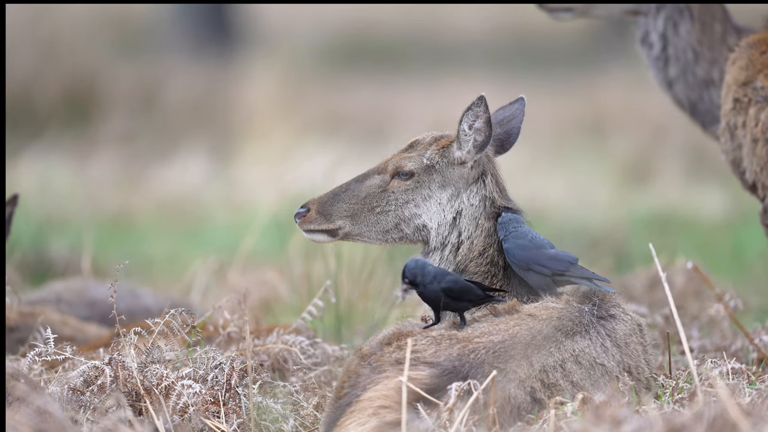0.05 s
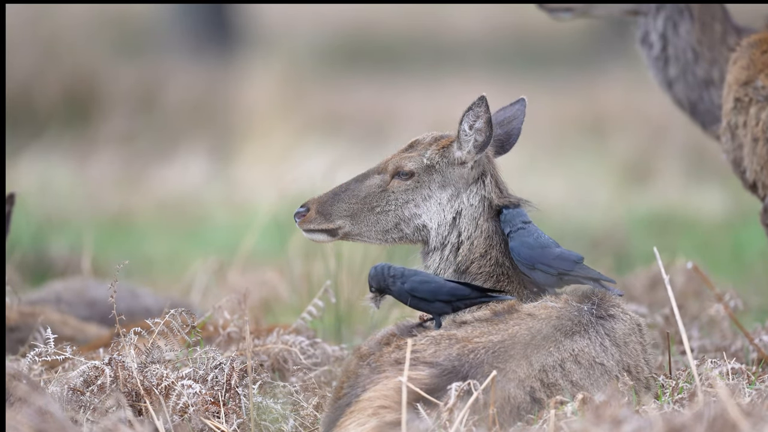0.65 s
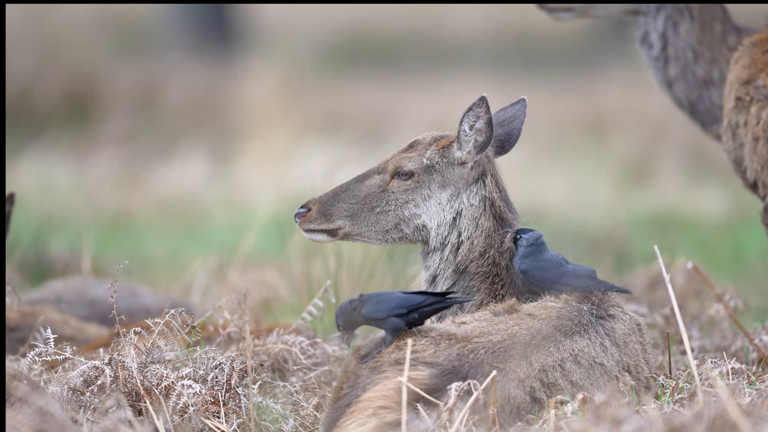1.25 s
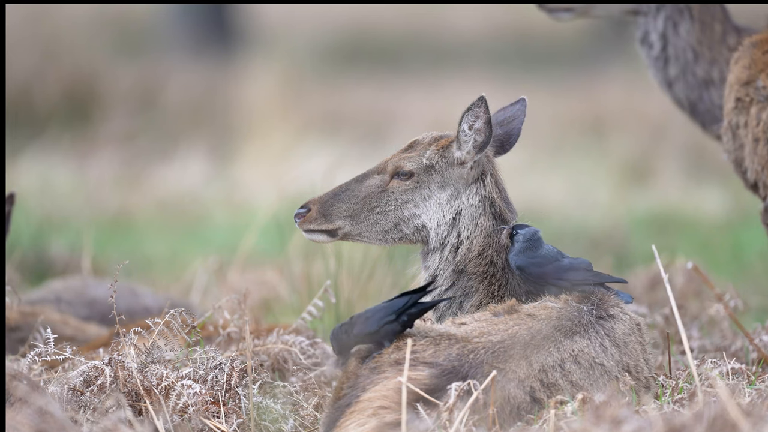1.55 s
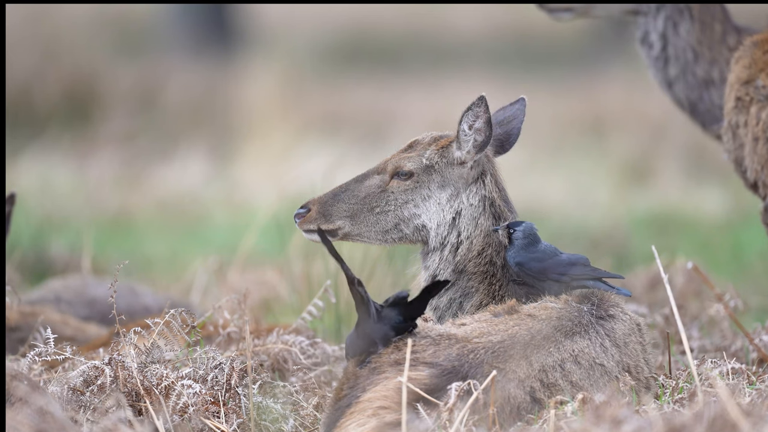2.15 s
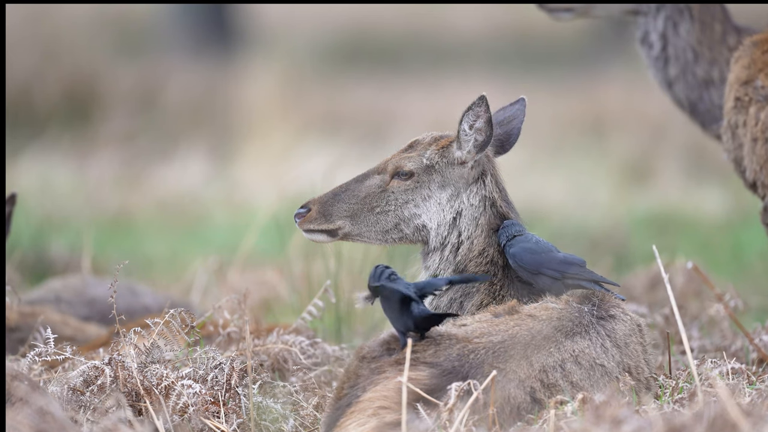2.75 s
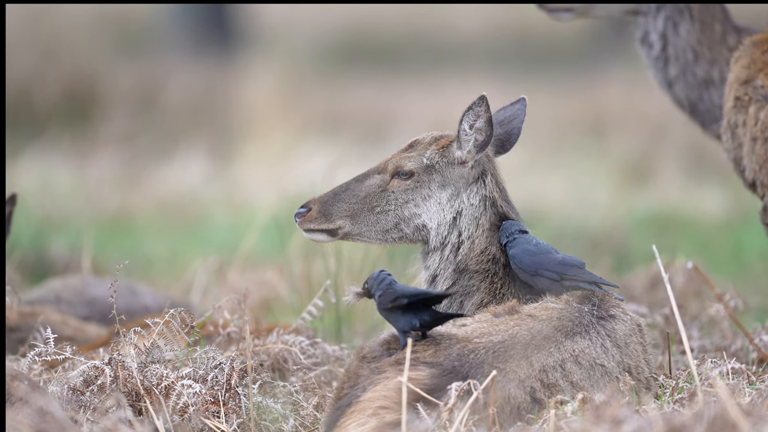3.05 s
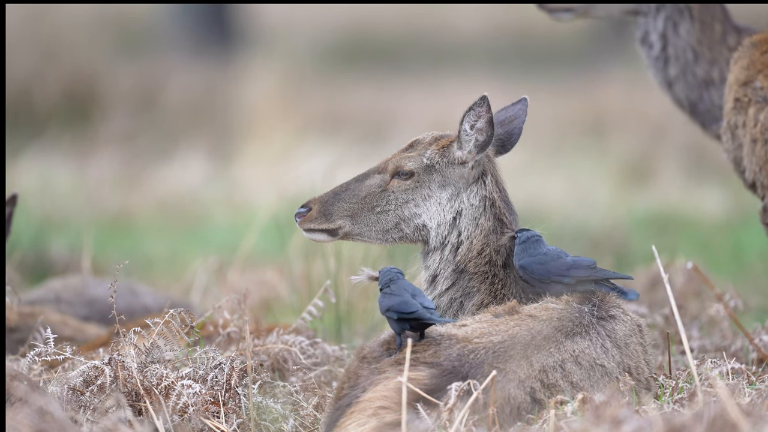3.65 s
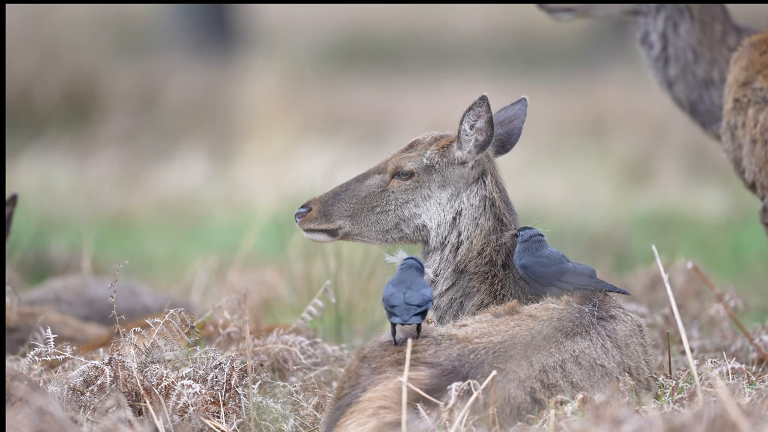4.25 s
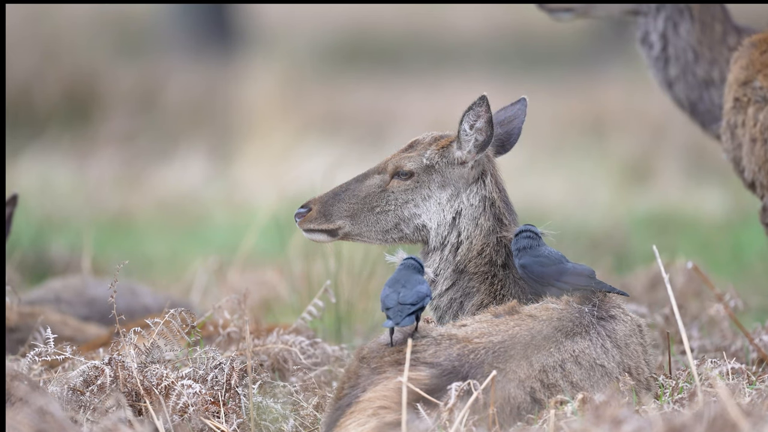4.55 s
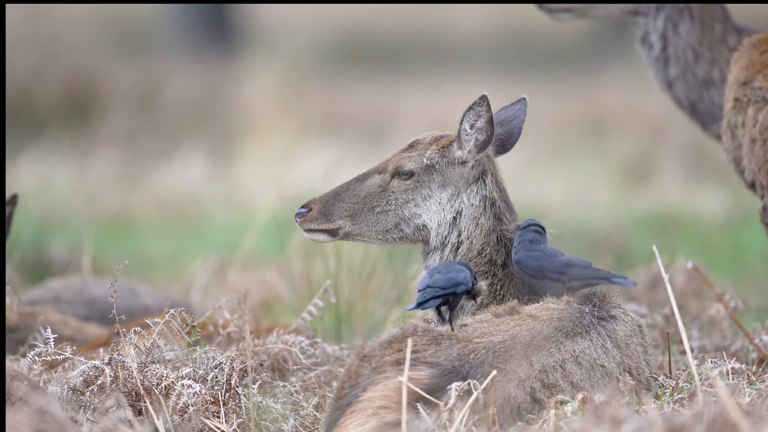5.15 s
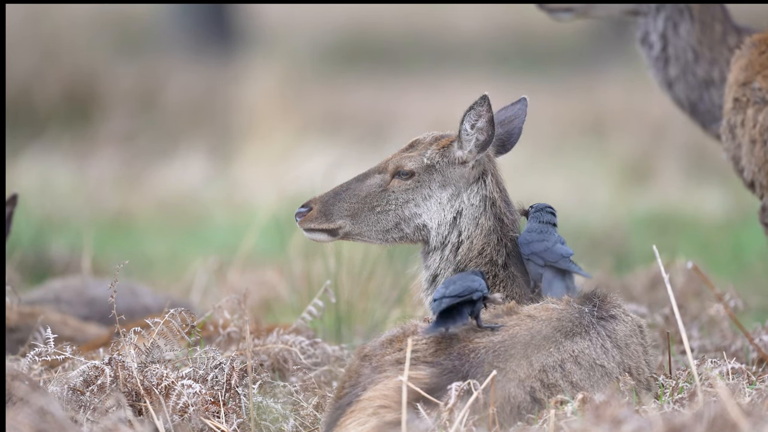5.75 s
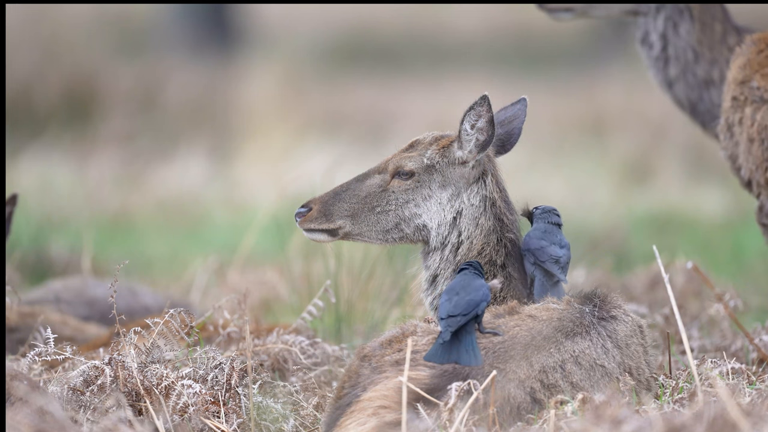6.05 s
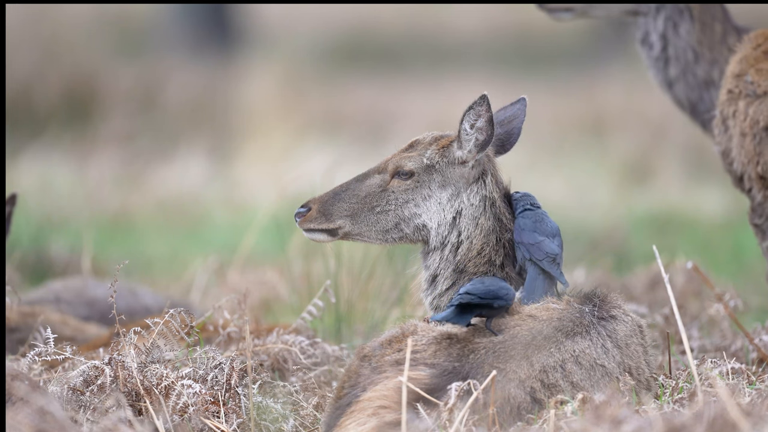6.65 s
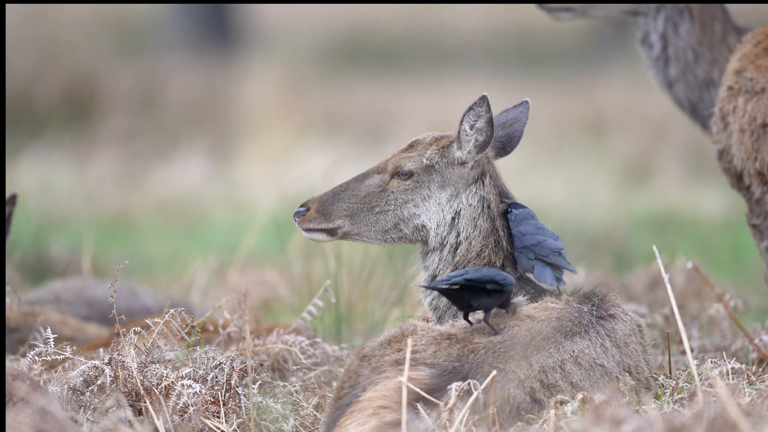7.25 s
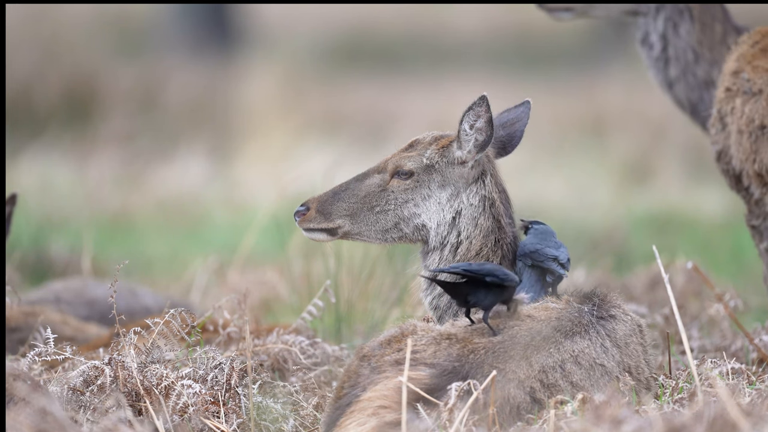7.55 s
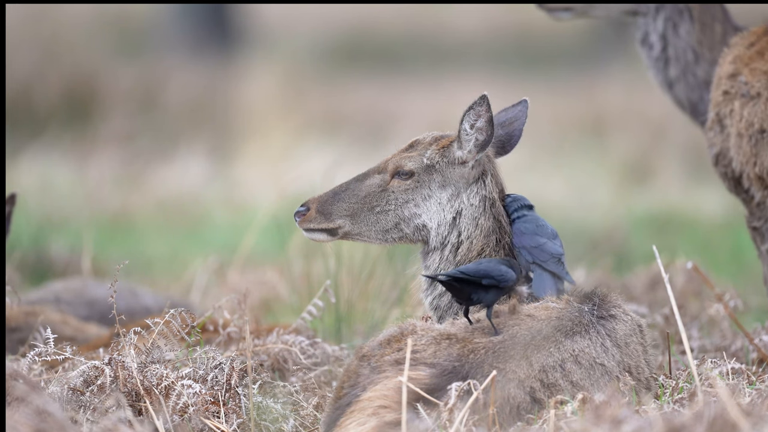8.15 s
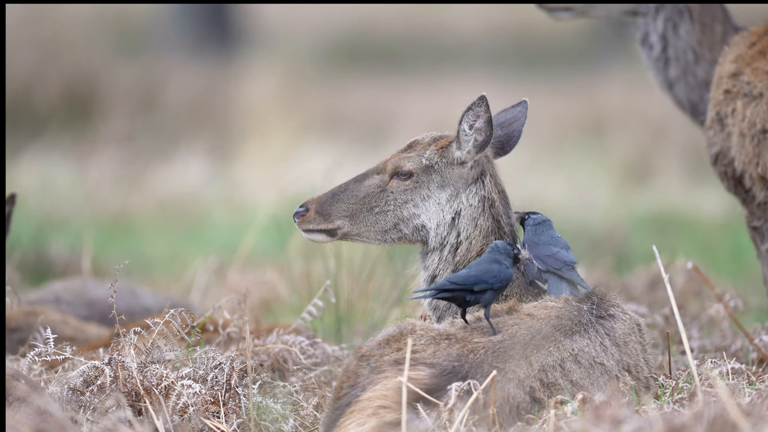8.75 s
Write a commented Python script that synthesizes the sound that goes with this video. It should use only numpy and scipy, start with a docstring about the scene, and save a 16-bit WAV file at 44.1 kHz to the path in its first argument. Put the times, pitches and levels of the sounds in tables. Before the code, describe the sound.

In open parkland, a small unseen bird fairly near the microphone gives a thin, very high whistle, runs into a quick warble, then breaks into a loud twittering chatter with sharp chips. A soft rustle, like wings, swells under it. After that only faint distant calls and ticks remain, with a few thin whistles near the end. A low rumble of far traffic continues throughout.

```python
"""Songbird in open parkland

A small bird gives thin high whistles, a warble and a quick chatter, often from both sides of its
syrinx at once, so that two tones beat. A line of trees reflects the song, and a soft rustle, likely
of wings, swells under the chatter. Other birds call far away over the rumble of distant traffic;
the electronics add a faint hiss and a high whine."""
import sys
import numpy as np
from scipy import signal
from scipy.fft import rfft, irfft
from scipy.io import wavfile
from scipy.ndimage import uniform_filter1d, map_coordinates

SR = 44100
rng = np.random.default_rng(int(sys.argv[2]) if len(sys.argv) > 2 else 0)


def wav_record(signal):
    """Record a signal, one row per channel, as 16-bit PCM in the file named by sys.argv[1]."""
    frames = np.transpose(np.atleast_2d(signal))
    bounded = np.clip(frames, -1, 1)
    # unit amplitude maps onto the largest positive 16-bit level
    quanta = np.round(bounded * 32767).astype(np.int16)
    wavfile.write(sys.argv[1], SR, quanta)


N = 392490
TIME = np.arange(N) / SR
CUTOFF_HZ = 15900


def from_db(db):
    """The decibel scale: 20 dB is a factor of ten in amplitude."""
    return 10 ** (np.asarray(db) / 20)


def rms_one(x):
    """Normalisation to unit rms."""
    return x / np.sqrt(np.mean(x ** 2) + 1e-20)


def at_hz(points, hz):
    """Interpolation of a table on a logarithmic frequency axis."""
    freqs, values = np.transpose(points)
    return np.interp(np.log(np.maximum(hz, 1)), np.log(freqs), values)


def pan(left_db):
    """Level difference as a cue to direction: the left and right gains."""
    return from_db(np.array([[.5], [-.5]]) * left_db)


def drift(rate_hz, size):
    """Random modulation: a smooth curve through rate_hz values a second, each of spread 1."""
    steps = np.arange(size) * rate_hz / SR
    return map_coordinates(rng.standard_normal(int(steps[-1]) + 3), [steps], order=3, mode="mirror")


def delayed(x, seconds):
    """Propagation delay, interpolated between samples."""
    return np.interp(TIME - seconds, TIME, x, left=0)


def add(track, start_s, sound):
    """Superposition: a sound sums into a track."""
    at = round(start_s * SR)
    track[at:at + len(sound)] += sound[:N - at]


def gate(size, edge_s):
    """A window with raised-cosine edges, which limit spectral splatter."""
    from_edge = np.minimum(np.arange(size), np.arange(size)[::-1]) / SR
    return np.sin(np.pi / 2 * np.clip(from_edge / edge_s, 0, 1)) ** 2


def scatter(x, t60_s, gap_s=0):
    """Diffuse reflection from ground and plants: an exponential decay, different on each side."""
    t = TIME[:SR]
    tail = rng.standard_normal((2, SR)) * from_db(-60 * t / t60_s) * (t > gap_s)
    tail /= np.sqrt(np.sum(tail ** 2, axis=1, keepdims=True))
    return signal.fftconvolve(x[None], tail, axes=1)[:, :N]


# Likeness of the left and right noise: frequency_hz, correlation
NOISE_CORRELATION = [(40, 1), (150, 0.76), (350, 0.1), (700, 0.68), (1300, -0.38), (3000, 0.03)]
# Lean of the noise to one side: frequency_hz, left_minus_right_db
NOISE_BALANCE = [(60, 0.39), (150, 7.1), (380, 5.9), (950, 3), (6000, 2.67)]


def air_noise(spectrum):
    """Partial coherence: coloured stereo noise from mid and side parts; the channel mean has rms 1."""
    hz = np.arange(N // 2 + 1) * SR / N
    correlation = np.clip(at_hz(NOISE_CORRELATION, hz), -.99, .99)
    mid, side = rfft(rng.standard_normal((2, N)))
    pair = mid + np.sqrt((1 - correlation) / (1 + correlation)) * side * [[1], [-1]]
    noise = irfft(pair * pan(at_hz(NOISE_BALANCE, hz)) * from_db(at_hz(spectrum, hz)), N)
    return noise / np.std(noise.mean(axis=0))


# Spectrum of the road: frequency_hz, relative_density_db
ROAD_SPECTRUM = [(30, -9), (60, -23.5), (115, -7.5), (270, -3.5), (450, -1.5), (550, 0.5), (730, 0.5),
                 (1100, -12), (1800, -18.5), (3000, -48)]
# Envelope of one far motor: time_s, level_db
MOTOR_ENVELOPE = [(0, -85), (1.2, -76.5), (3.6, -74), (4.4, -75.5), (5, -85)]


def traffic(road_db=-62.5, swell_db=0.34, swell_rate_hz=4, hum_hz=299, wander_hz=3):
    """A tone in broadband noise: one motor's wandering hum stands out from a gently swelling road."""
    road = air_noise(ROAD_SPECTRUM) * from_db(road_db + swell_db * drift(swell_rate_hz, N))
    phase = 2 * np.pi * np.cumsum(hum_hz + wander_hz * drift(11, N)) / SR
    hum = np.sqrt(2) * np.sin(phase) * from_db(np.interp(TIME, *np.transpose(MOTOR_ENVELOPE)))
    return road + hum * pan(left_db=9)


def slur(first_hz, last_hz, length_s, waver, arch_ratio=.04, edge_s=0.0063, waver_rate_hz=450):
    """Random frequency modulation makes an arched glide hoarse; waver is a share of the pitch."""
    size = int(length_s * SR)
    arch = arch_ratio * np.sin(np.linspace(0, np.pi, size))
    hz = np.geomspace(first_hz, last_hz, size) * (1 + arch + waver * drift(waver_rate_hz, size))
    return np.sqrt(2) * gate(size, edge_s) * np.sin(2 * np.pi * np.cumsum(hz) / SR)


def far_flock(level_db, low_hz, high_hz, length_s, count):
    """Partial masking: the farthest birds call at random, barely heard over the road."""
    out = np.zeros(N)
    for when, pitch in rng.random((count, 2)):
        hz = low_hz * (high_hz / low_hz) ** pitch
        add(out, when * TIME[-1], from_db(level_db) * slur(hz, hz * .92, length_s, waver=.03))
    return out


# Slurred calls of far birds: start_s, length_s, first_hz, last_hz, relative_db, waver_ratio
FAR_SLURS = [(0.075, 0.05, 2090, 2100, -75, .02), (0.558, 0.082, 1980, 1895, -69.5, 0.014),
             (3.029, 0.056, 2600, 2500, -72.5, 0.034), (3.105, 0.046, 3580, 5140, -71.5, 0.025),
             (3.069, 0.32, 1937, 1963, -77.5, 0.023), (3.367, 0.08, 3260, 3200, -74.5, 0.022),
             (3.482, 0.049, 1370, 1380, -69, .02), (3.85, 0.056, 1460, 1603, -73, .03),
             (5.51, 0.05, 3300, 2690, -74.5, 0.056), (5.7, 0.056, 3055, 2850, -70, 0.056),
             (5.777, 0.11, 3090, 2396, -71.5, .08), (6.19, 0.054, 2130, 2160, -72, .07),
             (6.43, 0.067, 2050, 2720, -76, .02), (6.485, 0.12, 2760, 2360, -72.5, 0.019),
             (6.491, 0.1, 4740, 4490, -76, 0.032), (6.499, 0.09, 1350, 1260, -68.5, .02),
             (7.335, 0.04, 3220, 3200, -76, .015), (7.48, 0.06, 5400, 5980, -78, .03),
             (7.792, 0.031, 5040, 5050, -72, .03), (7.842, 0.049, 2125, 2394, -69.5, 0.079),
             (8.08, 0.056, 2320, 2290, -70.5, 0.089), (8.097, 0.031, 4980, 5560, -71, .05),
             (8.5, 0.14, 1640, 1448, -77.5, .025)]
# One far bird's runs of falling ticks: first_tick_s, last_tick_s, starting_pitch_hz, relative_db
FAR_TICKS = [(4.772, 4.854, 4400, -70), (5.043, 5.158, 3900, -69.5), (5.252, 5.323, 3750, -67.5),
             (6.16, 6.32, 3900, -71.5), (7.756, 7.859, 4000, -71.5), (8.508, 8.875, 3900, -73.5)]


def far_birds(direct_call_db=-6, tick_db=-3, direct_tick_db=-2, scattered_db=-0.5, tick_gap_s=.075):
    """Scattering blurs hoarse calls and uneven ticks, whose overtones are lost over the distance."""
    calls, ticks = np.zeros((2, N))
    for start_s, length_s, first_hz, last_hz, level_db, waver in FAR_SLURS:
        add(calls, start_s, from_db(level_db) * slur(first_hz, last_hz, length_s, waver))
    for first_s, last_s, run_hz, level_db in FAR_TICKS:
        for start_s in np.linspace(first_s, last_s, round((last_s - first_s) / tick_gap_s) + 1):
            higher, louder = rng.uniform(-1.01, 1, 2)
            hz = run_hz * (1 + 0.0903 * higher)
            tick = slur(hz, hz * .74, length_s=0.0217, waver=0.032)
            add(ticks, start_s, from_db(level_db + tick_db + 2 * louder) * tick)
    direct = from_db(direct_call_db) * calls + from_db(direct_tick_db) * ticks
    return direct + from_db(scattered_db) * scatter(calls + ticks, t60_s=0.2)


# Swell of the rustle: time_s, level_db
RUSTLE_ENVELOPE = [(1.7, -89), (1.9, -67.5), (2.13, -63.5), (2.3, -81), (2.65, -73.5), (3.1, -81)]
# Spectrum of the rustle: frequency_hz, relative_density_db
RUSTLE_SPECTRUM = [(600, -28.5), (1500, 1.5), (4500, -2), (12000, -29)]


def rustle():
    """Amplitude-modulated noise, as of feathers brushing the air."""
    level_db = np.interp(TIME, *np.transpose(RUSTLE_ENVELOPE), left=-np.inf, right=-np.inf)
    return air_noise(RUSTLE_SPECTRUM) * from_db(level_db)


# Reflections from the line of trees: delay_s, left_db, right_db
TREE_ECHOES = [(0.154, -36.5, -27), (0.313, -47, -42.5)]


def park(song, left_db=2.0, lag_s=.00001, ground_db=-20, tail_db=-24, tail_hz=3700):
    """Multipath propagation: direct sound, early scatter from bracken, a dull tail and tree echoes."""
    direct = np.array([song, delayed(song, lag_s)]) * pan(left_db)
    echoes = sum(from_db([[left], [right]]) * scatter(delayed(song, delay_s), t60_s=0.01978)
                 for delay_s, left, right in TREE_ECHOES)
    ground = from_db(ground_db) * scatter(song, t60_s=0.1003, gap_s=0.0091)
    dull = signal.sosfilt(signal.butter(2, tail_hz, fs=SR, output="sos"), song)
    tail = from_db(tail_db) * scatter(dull, t60_s=0.49, gap_s=0.013)
    return direct + ground + tail + echoes


def contour(points, size):
    """Linear interpolation of pitch and level along a note, from rows of place, pitch_hz, level_db."""
    place, hz, level_db = np.transpose(points)
    along = np.linspace(place[0], place[-1], size)
    return np.interp(along, place, hz), np.interp(along, place, level_db)


def note(start_s, length_s, middle_hz, glide_hz, level_db, bend, fade_db):
    """Parabolic modulation of a glide: its ends are raised by the share bend and softer by fade_db."""
    place = np.linspace(-1, 1, int(length_s * SR))
    hz = middle_hz * (1 + bend * place ** 2) + glide_hz * place / 2
    return start_s, hz, level_db - fade_db * place ** 2


# The longest whistle, thin and high: time_s, pitch_hz, level_db
WHISTLE_CONTOUR = [(1.07, 8809, -61), (1.08, 8758, -62), (1.19, 8313, -57.5), (1.25, 8290, -56),
                   (1.37, 8410, -56.5), (1.416, 8111, -60), (1.425, 8100, -61)]
# Plain whistles: start_s, length_s, middle_hz, glide_hz, level_db, arch_ratio
WHISTLE_NOTES = [(0.93, 0.12, 8010, -130, -59.5, 0.0036), (1.047, 0.0098, 8330, 200, -62, .01),
                 (1.074, 0.35, 7730, -480, -64, .001), (1.638, 0.027, 4330, 200, -41, .035),
                 (1.755, 0.016, 4285, -120, -28, .02), (1.834, 0.041, 2540, -20, -40.5, .001),
                 (1.985, 0.15, 2970, -170, -55, .05), (2.011, 0.115, 3460, -170, -51.5, 0.04),
                 (8.456, 0.053, 8240, 0, -62, 0.079), (8.512, 0.027, 7800, -150, -59.5, 0.028),
                 (8.545, 0.045, 8460, 904, -67.5, .035), (8.839, 0.085, 7620, 400, -66, .025)]


def whistles():
    """Two independent oscillators: whistles that overlap come from the two sides of the syrinx."""
    first_s, last_s = WHISTLE_CONTOUR[0][0], WHISTLE_CONTOUR[-1][0]
    longest = (first_s, *contour(WHISTLE_CONTOUR, int((last_s - first_s) * SR)))
    return [longest] + [note(*row, bend=-arch, fade_db=4) for *row, arch in WHISTLE_NOTES]


# Scoops of the warble: start_s, length_s, middle_hz, glide_hz, level_db
WARBLE_SCOOPS = [(1.599, 0.026, 3630, 251, -49), (1.621, 0.031, 2980, -350, -49),
                 (1.667, 0.026, 3810, 1.5, -36.5), (1.693, 0.037, 4340, -49.5, -33.5),
                 (1.731, 0.025, 4180, -330, -31.5), (1.769, 0.045, 3410, -100, -36),
                 (1.816, 0.018, 3024, -600, -38.5), (1.948, 0.018, 3260, 52, -47),
                 (1.978, 0.017, 3400, 200, -52), (1.997, 0.016, 3480, 149.5, -50)]


def warble():
    """Rapid frequency modulation: a chain of short notes, each dipping in pitch."""
    return [note(*row, bend=0.078, fade_db=3.5) for row in WARBLE_SCOOPS]


# One twitter sung twice: start_s, length_s, pitch_ratio, level_db, first_arch_push_db
CHATTER = [(2.152, 0.104, .995, -26, -6), (2.448, 0.108, 1.005, -25.5, 4)]
# Its waving lower voice and nearly level upper voice: place_in_lengths, pitch_hz, relative_db
LOWER_VOICE = [(0, 2667, -18), (.12, 2942, -9), (.17, 3473, -3), (.25, 4180, -3.5), (.36, 4130, -13.5),
               (.46, 3330, -8.5), (.53, 3330, -5.5), (.57, 3550, -8.5), (.61, 3760, 0.5), (.68, 3773, -2),
               (.78, 3520, -19), (.88, 3020, -11), (1, 2430, -17.5)]
UPPER_VOICE = [(0.239, 4756, -16.5), (.35, 5198, -9.5), (.39, 5243, -14.5), (.44, 4950, -32),
               (.57, 5150, -29.5), (.63, 4915, -2), (.71, 4880, -1), (.77, 4900, -23), (.97, 4870, -21)]
# Its three closing pips: start_in_lengths, length_s, middle_hz, glide_hz, relative_db
CLOSING_PIPS = [(1, 0.014, 3770, -80, -2.5), (1.15, 0.013, 4280, -150, -14),
                (1.29, 0.015, 3250, 448.5, -5.5)]


def twitters(arch_place=0.28, arch_width=0.099):
    """Biphonation: both sides of the syrinx sing together in each twitter, then come the pips."""
    notes = []
    for start_s, length_s, pitch_ratio, level_db, push_db in CHATTER:
        for voice in (LOWER_VOICE, UPPER_VOICE):
            first, last = voice[0][0], voice[-1][0]
            hz, db = contour(voice, int((last - first) * length_s * SR))
            place = np.linspace(first, last, len(hz))
            arch = np.exp(-((place - arch_place) / arch_width) ** 2)
            notes.append((start_s + first * length_s, pitch_ratio * hz, level_db + db + push_db * arch))
        for place, pip_s, hz, glide_hz, db in CLOSING_PIPS:
            notes.append(note(start_s + place * length_s, pip_s, pitch_ratio * hz, glide_hz,
                              level_db + db, bend=0, fade_db=10.5))
    return notes


# Loud chips: start_s, length_s, first_hz, top_hz, level_db, swell_db
CHIP_NOTES = [(2.303, 0.036, 4190, 4427, -22, 0.5), (2.603, 0.039, 3840, 4490, -23, 1.5),
              (2.801, 0.048, 3493, 4546, -28, 10.5)]


def chips(climb_share=.52, dive_s=.0145, last_hz=2000, fade_db=29):
    """Coupled frequency and amplitude sweeps: a chip swells as it climbs, holds, and fades in a dive."""
    notes = []
    for start_s, length_s, first_hz, top_hz, level_db, swell_db in CHIP_NOTES:
        t = TIME[:int(length_s * SR)]
        below_top = np.clip(1 - t / (climb_share * length_s), 0, 1) ** 2
        dive = np.clip(1 - (length_s - t) / dive_s, 0, 1)
        climb_hz = top_hz + (first_hz - top_hz) * below_top
        hz = climb_hz * (last_hz / top_hz) ** (dive ** 1.164)
        notes.append((start_s, hz, level_db - swell_db * below_top - fade_db * dive ** 1.517))
    return notes


CHATTER_S = 2.14  # from here on the bird forces its notes
# Radiation of overtones from the beak: overtone_hz, relative_db
BEAK_RESPONSE = [(5600, -13.5), (6600, -30), (7500, -27.5), (8400, -42), (10500, -37.5), (14000, -56.5)]


def syrinx(notes, edge_s=0.0028, waver_hz=30, flutter_db=1.4, third_db=-3, forced_db=4):
    """Self-sustained oscillation: nearly pure tones; forcing strengthens their tremble and overtones."""
    out, last_phase = np.zeros(N), np.zeros(2 * N)
    margin = int(edge_s * SR / 2)
    for start_s, pitch_hz, note_db in sorted(notes, key=lambda sung: sung[0]):
        at, size = round(start_s * SR), len(pitch_hz)
        force = from_db(forced_db * (start_s > CHATTER_S))
        hz = np.pad(pitch_hz, margin, mode="edge")
        level_db = np.pad(note_db, margin, mode="edge")
        hz += force * waver_hz * drift(rate_hz=330, size=len(hz))
        level_db += force * flutter_db * drift(rate_hz=170, size=len(hz))
        phase = 2 * np.pi * np.cumsum(hz) / SR
        phase += last_phase[at] - phase[margin]  # a slurred note carries on the phase of the one before
        last_phase[at - margin:at + size + margin] = phase
        tone = np.sin(phase)
        for harmonic, extra_db in ((2, 0), (3, third_db)):
            gain = force * from_db(at_hz(BEAK_RESPONSE, harmonic * hz) + extra_db)
            tone += gain * np.sin(harmonic * phase) * (harmonic * hz < CUTOFF_HZ)
        add(out, start_s - margin / SR, np.sqrt(2) * tone * from_db(level_db) * gate(len(hz), edge_s))
    return out


def near_bird(coupling=0.12, rasp_db=-24, rasp_band_hz=(2900, 5700), calm_db=-10):
    """Nonlinear mixing of two voices makes combination tones.
    A band of noise follows the song's loudness and roughens it, most in the chatter."""
    song = syrinx(whistles() + warble() + twitters() + chips())
    power = np.abs(signal.hilbert(song)) ** 2
    steady = uniform_filter1d(power, size=110)  # a 2.5 ms average smooths out the beats
    beat = (power - steady) / (np.abs(steady) + 1e-9)
    rasp_band = signal.butter(2, rasp_band_hz, "band", fs=SR, output="sos")
    rasp = rms_one(signal.sosfilt(rasp_band, rng.standard_normal(N))) * np.sqrt(power / 2)
    return song * (1 - coupling * beat) + rasp * from_db(rasp_db + calm_db * (TIME < CHATTER_S))


def scene(air_hz=11000):
    """Superposition of the near bird, dulled by air absorption, with far birds, wings and road."""
    song = signal.sosfilt(signal.butter(4, air_hz, fs=SR, output="sos"), near_bird())
    large_birds = far_flock(level_db=-82, low_hz=1203, high_hz=2120, length_s=.07, count=50)
    small_birds = far_flock(level_db=-81.5, low_hz=2820, high_hz=5600, length_s=0.039, count=24)
    return park(song) + far_birds() * pan(left_db=9.5) + large_birds + small_birds + rustle() + traffic()


# Spectrum of the electronic hiss: frequency_hz, relative_density_db
HISS_SPECTRUM = [(1000, -38.5), (1800, -2), (3500, -2.5), (7100, -5), (15000, -12)]


def record(dry, hiss_db=-71.5, whine_hz=15626, whine_db=-76, offset=-.0031):
    """Self-noise and band limiting: electronics add hiss, a whine and an offset, and cut the top."""
    hiss = from_db(hiss_db) * air_noise(HISS_SPECTRUM)
    whine = np.sqrt(2) * from_db(whine_db) * np.sin(2 * np.pi * whine_hz * TIME) * pan(left_db=-4.0)
    low_pass = signal.ellip(12, .1, 80, CUTOFF_HZ, fs=SR, output="sos")
    return signal.sosfilt(low_pass, dry + hiss + whine) + offset


dry = scene()
out = record(dry)
wav_record(out)
```